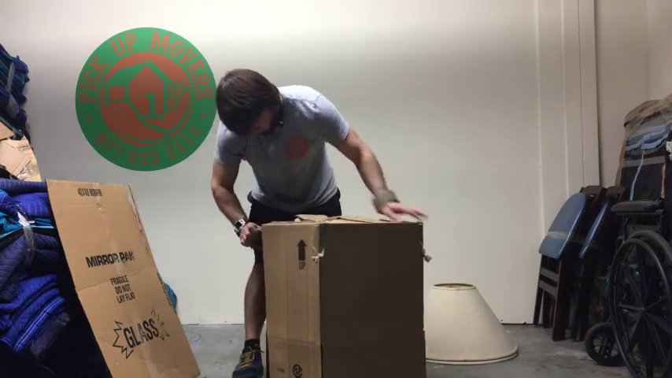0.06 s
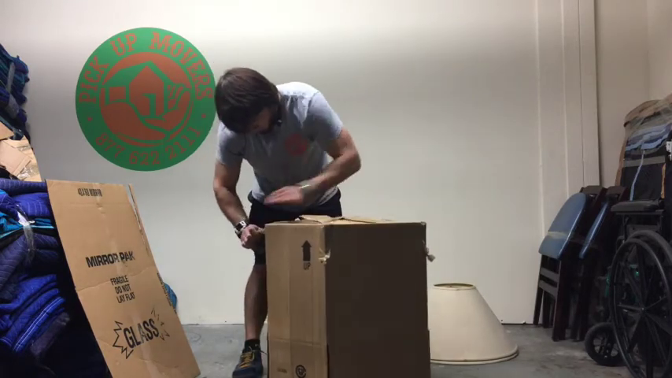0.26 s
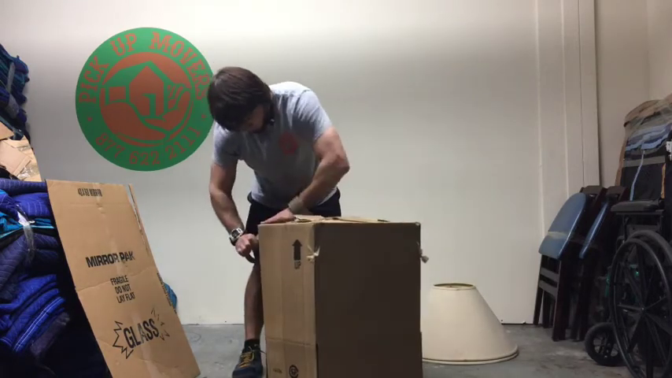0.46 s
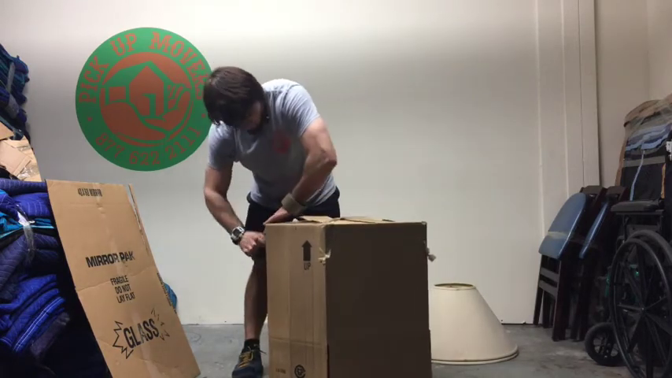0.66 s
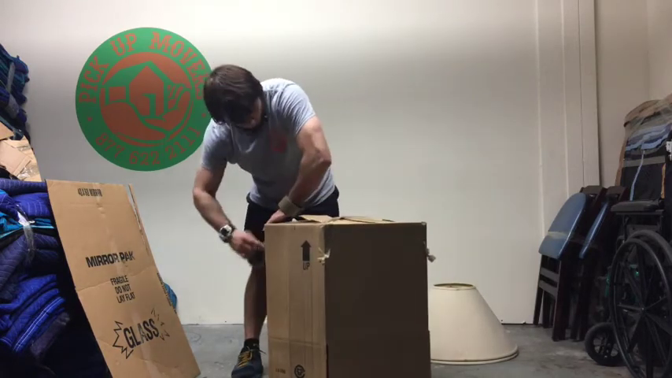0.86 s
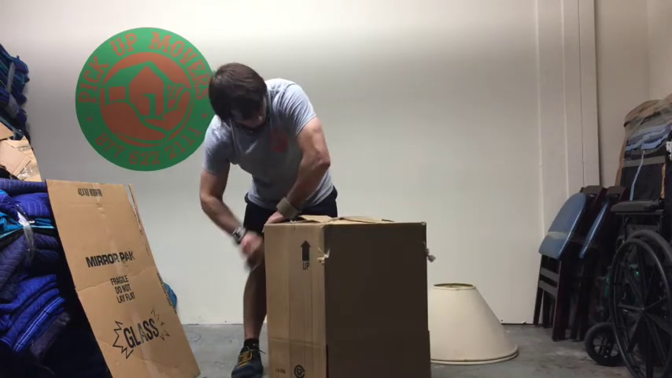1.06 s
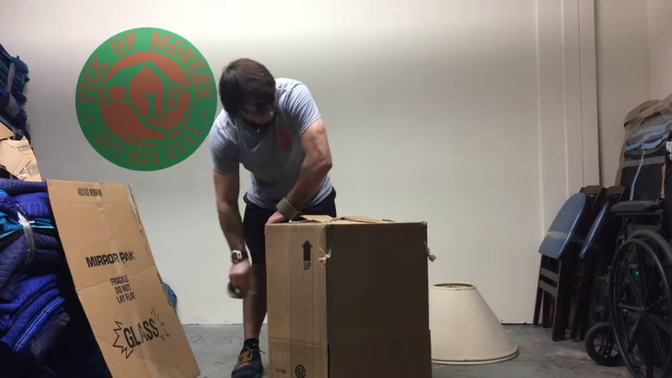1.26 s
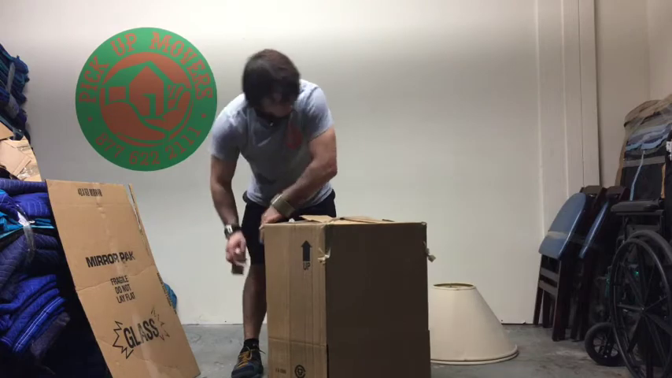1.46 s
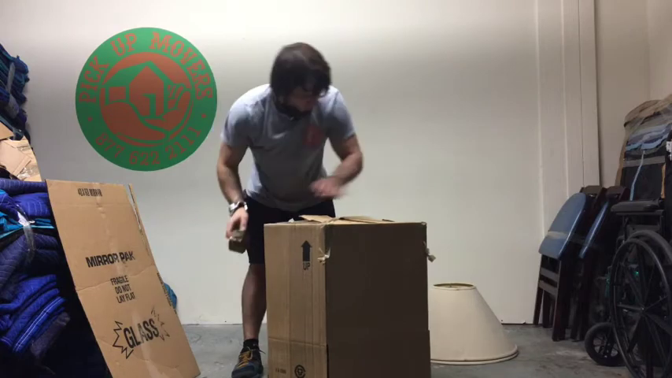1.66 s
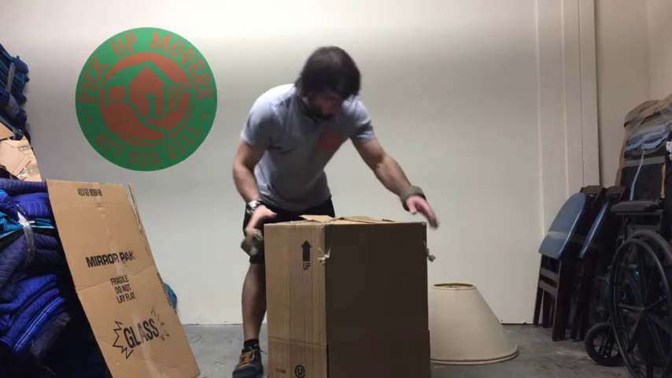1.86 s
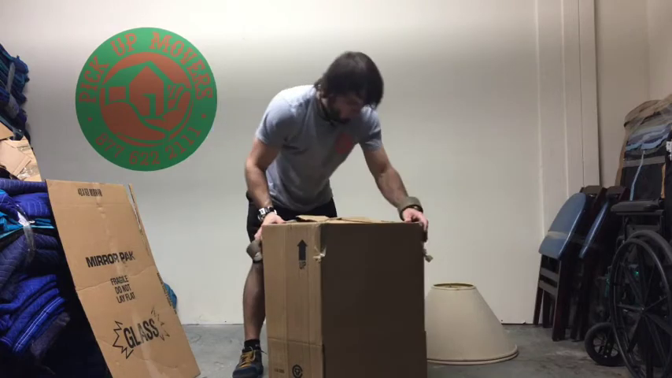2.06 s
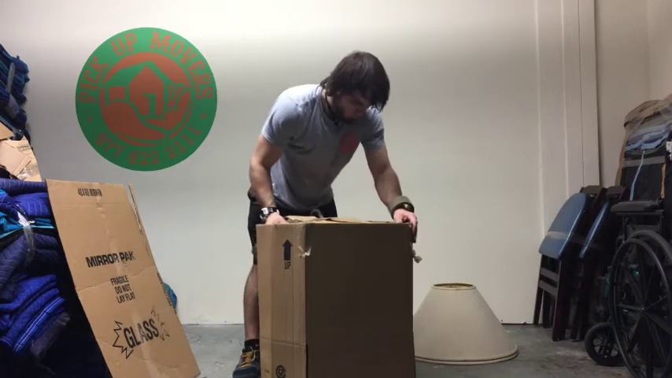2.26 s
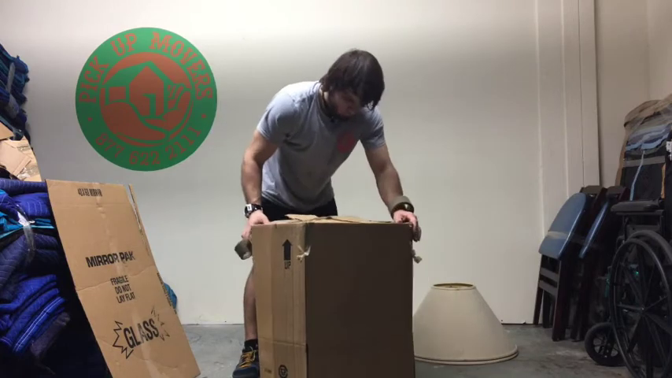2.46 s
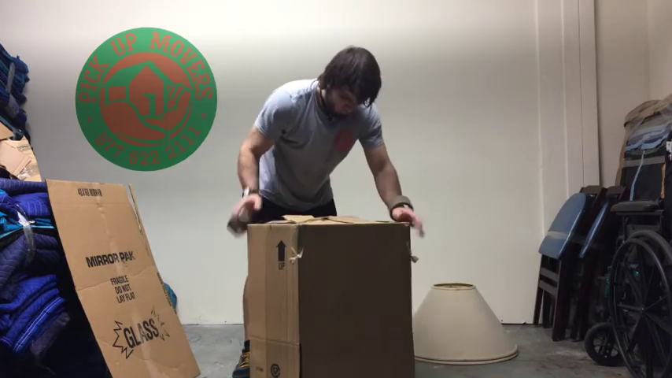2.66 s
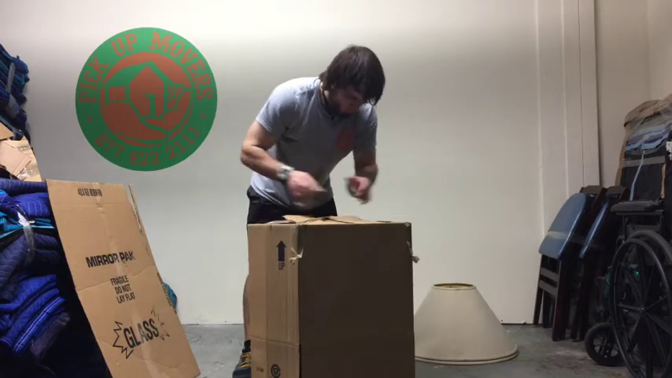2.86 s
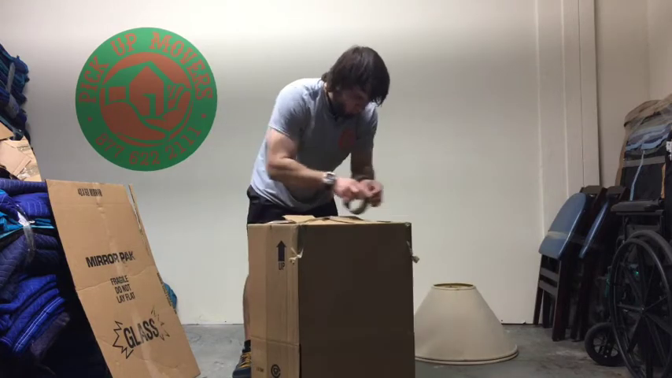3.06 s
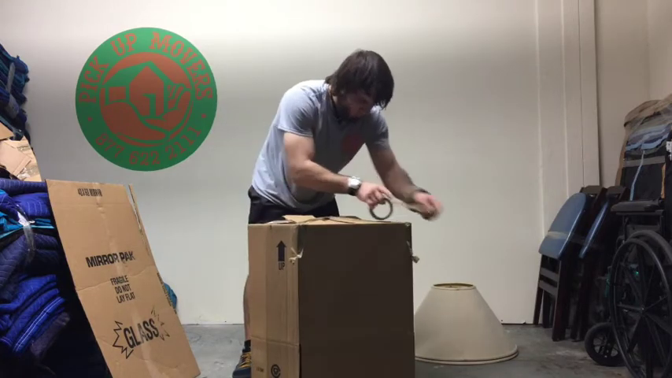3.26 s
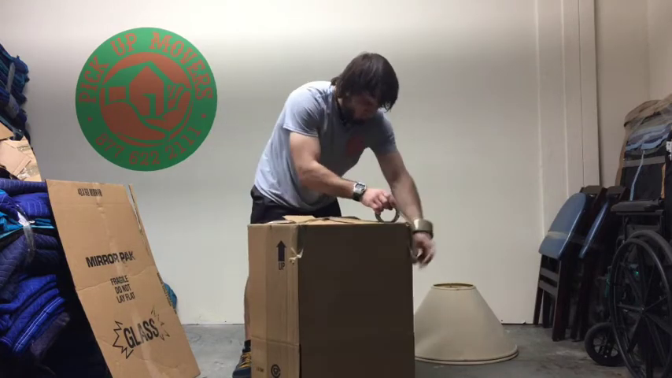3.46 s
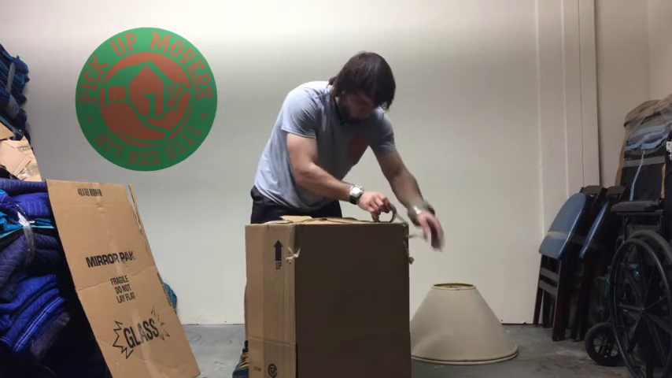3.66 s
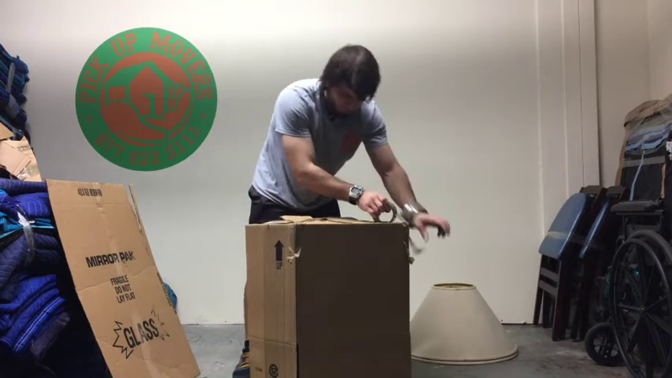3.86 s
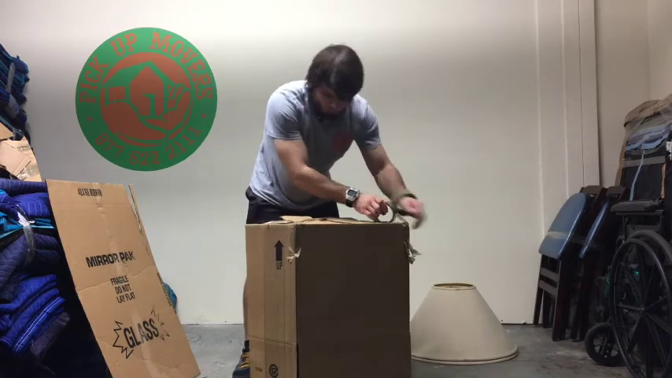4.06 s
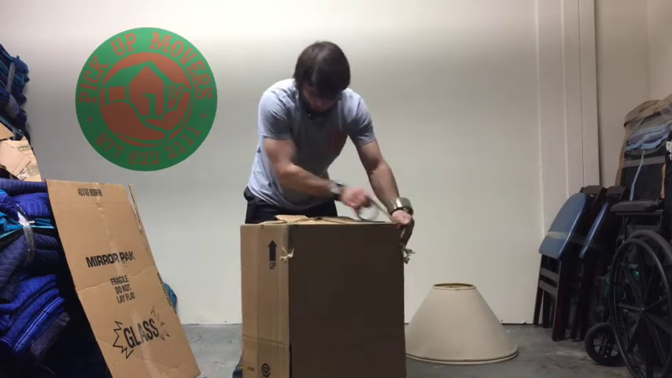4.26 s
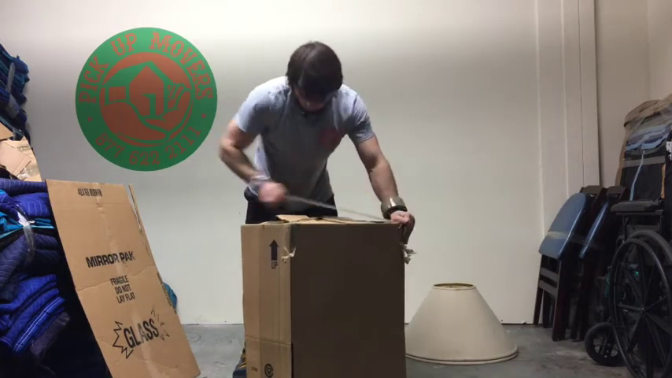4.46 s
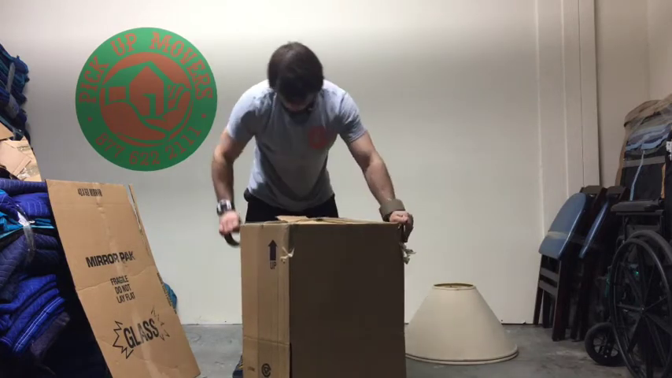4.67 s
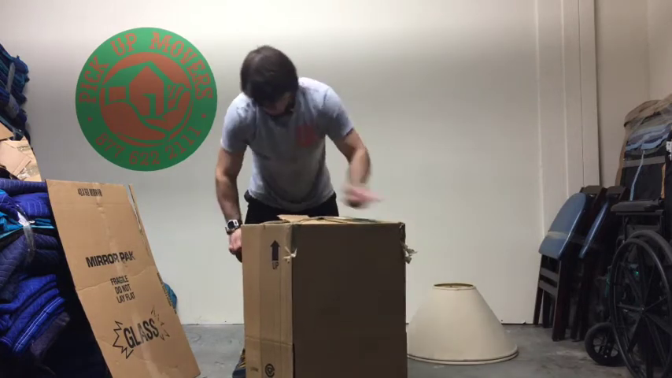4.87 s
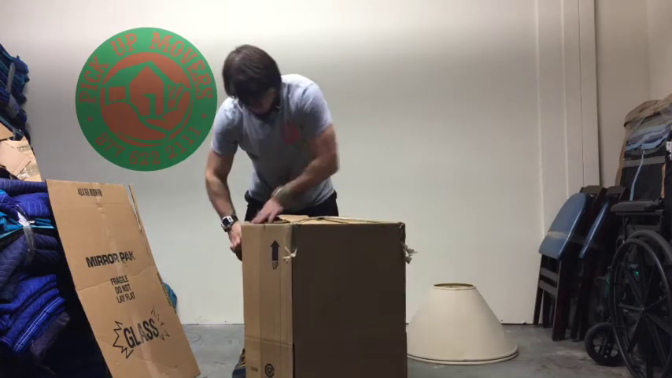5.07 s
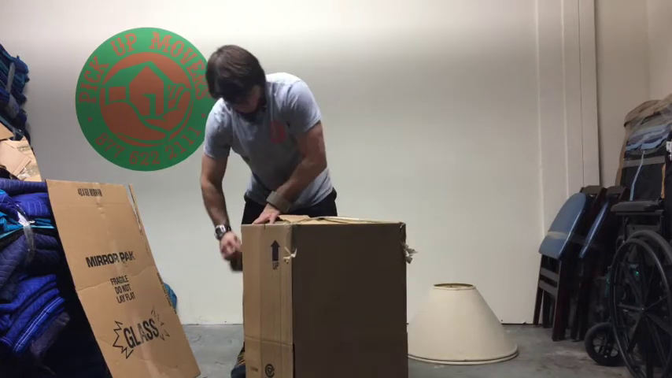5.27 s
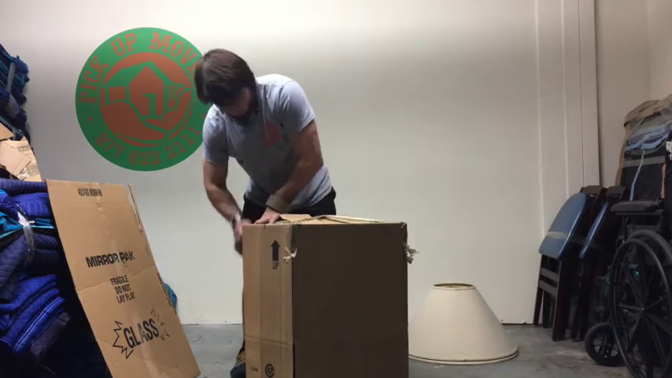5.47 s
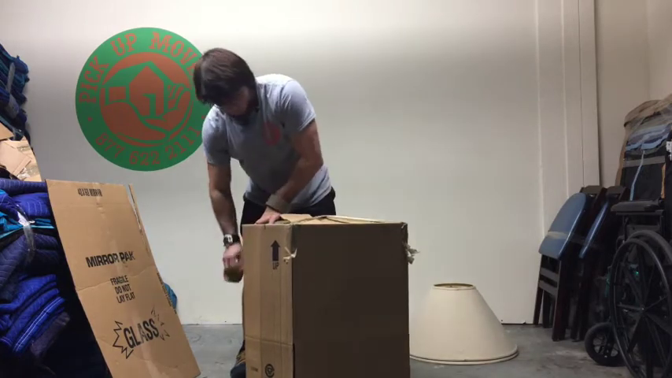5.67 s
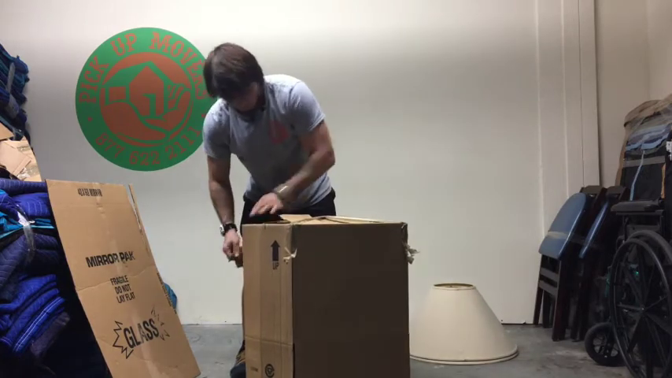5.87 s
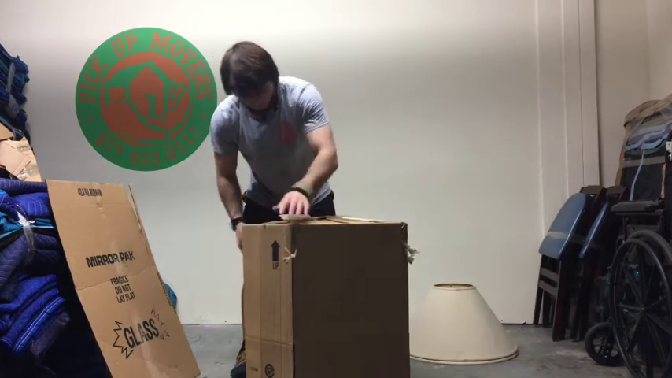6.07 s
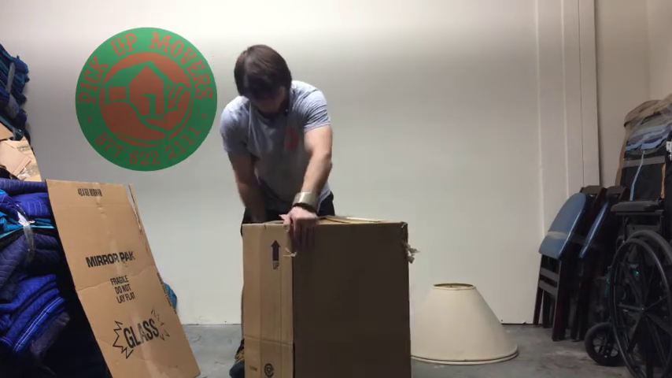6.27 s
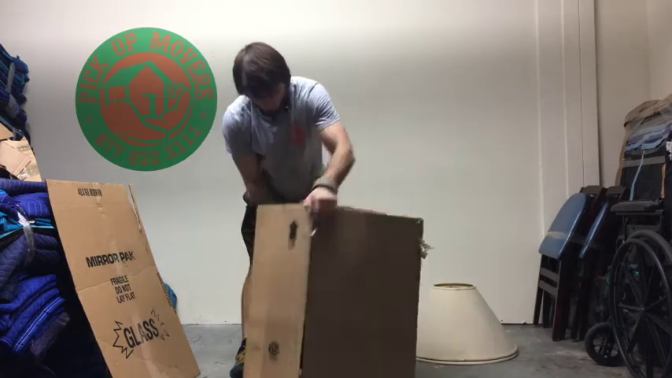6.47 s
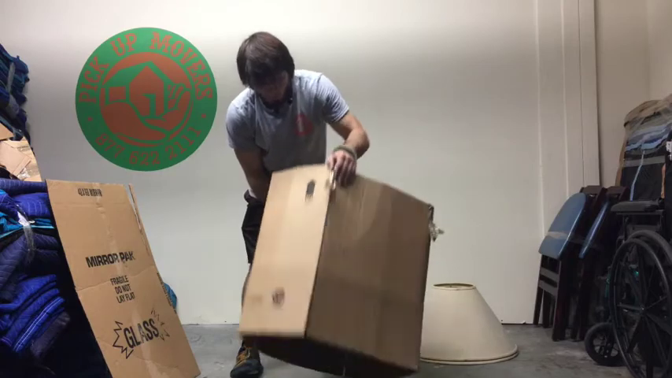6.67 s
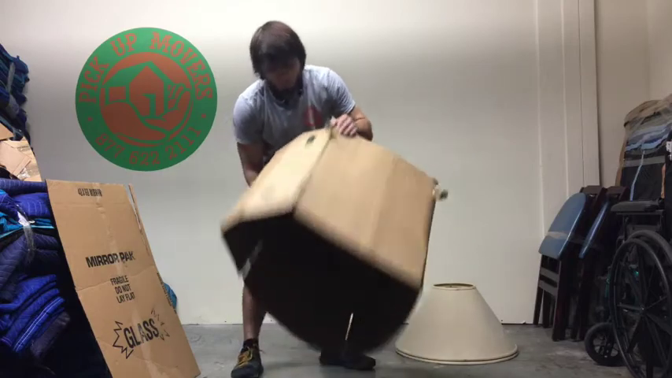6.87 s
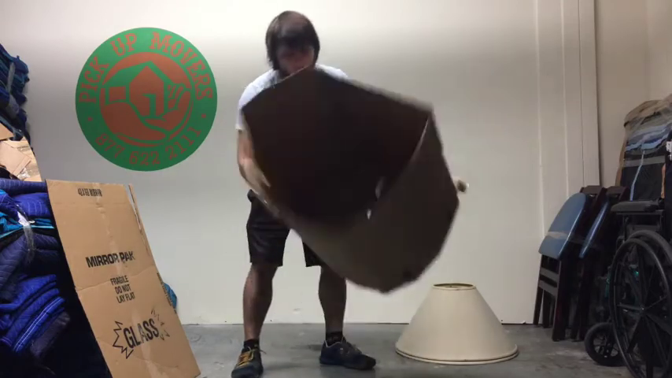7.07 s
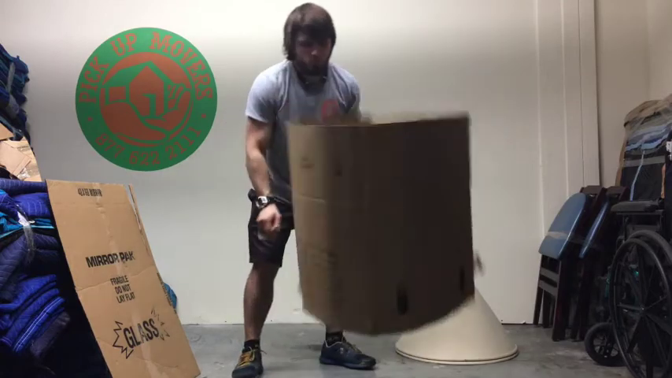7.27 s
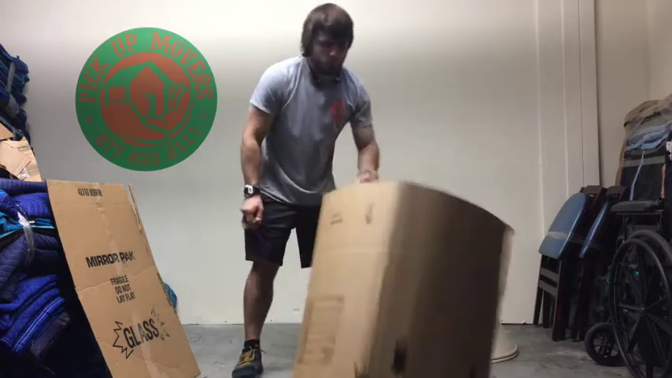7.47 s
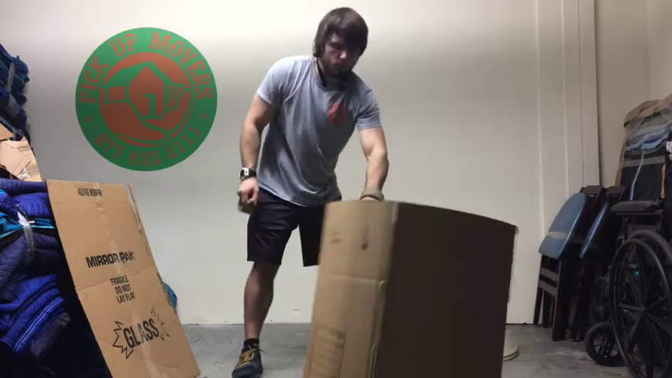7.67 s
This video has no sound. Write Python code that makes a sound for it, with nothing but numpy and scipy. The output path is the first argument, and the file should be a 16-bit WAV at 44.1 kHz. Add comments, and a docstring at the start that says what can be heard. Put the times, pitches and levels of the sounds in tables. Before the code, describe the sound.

Short bursts of sticky tape ripping, each crackly and ringing on the taut strip, alternate with papery hand slides, smoothing and muffled pats on cardboard. A longer rip comes midway with hard snaps and hollow knocks, then smaller rasps and rustles. Finally the carton is lifted with a scuffing rustle and dropped on a hard floor. Small reverberant room, mono, faint rumble and hiss behind.

```python
"""Hands rub and pat a big cardboard box while packing tape is peeled off a roll in short rasping strips.
More strips follow, torn and smoothed down, with loose tape snapping and crackling between them.
Near the end the box is turned over and dropped on a hard floor.
Random cracks and noise ring the tape strip and the box; knocks ring its panels and the air inside.
A bare storeroom answers throughout, and a low rumble, a faint tone and soft hiss hang in the air."""
import sys
import numpy as np
from scipy import signal
from scipy.fft import rfft, irfft, next_fast_len
from scipy.io import wavfile
from scipy.ndimage import map_coordinates

SR = 44100
rng = np.random.default_rng(int(sys.argv[2]) if len(sys.argv) > 2 else 0)


def bounce(signal):
    """Save signal as a 16-bit WAV file at the path given by the first command-line argument."""
    frames = np.transpose(np.atleast_2d(signal))
    limited = np.clip(frames, -1, 1)
    pcm = np.round(limited * 32767).astype(np.int16)
    wavfile.write(sys.argv[1], SR, pcm)


N = 340449  # length in samples

# Resonances of the cardboard panels, which pulls, rubs and knocks all set ringing:
# pitch_hz, relative level_db, decay_s (time to fall 60 dB before any extra damping)
PANELS = [(129.2, 2, 0.16), (155.5, 0.5, 0.13), (213.4, -0.5, 0.15), (235.6, 1, 0.14), (288, -2, 0.14),
          (387.4, -3.5, 0.11), (430, -10, 0.072), (497, -8.5, 0.022), (620, -13, 0.038),
          (830, -11.5, 0.026)]


def amp(db):
    """Turn decibels into a plain multiplier."""
    return 10 ** (np.asarray(db) / 20)


def unit(x):
    """Scale a sound to an average (rms) strength of 1."""
    return x / np.sqrt(np.mean(x ** 2) + 1e-20)


def along(points, hz):
    """Read a curve of (Hz, value) points, evenly spaced in pitch rather than in Hz."""
    point_hz, values = np.transpose(points)
    return np.interp(np.log(hz + 1), np.log(point_hz + 1), values)


def strokes(start, rise, hold, fade, *levels_db):
    """Loudness of many strokes: each rises, drifts through its levels while held, then fades; powers add."""
    rise_db, fade_db = 23, 30  # climb during the rise; drop in one fade time
    late_turn = 0.62  # under 1, the middle level of a held stroke comes after half-way
    power, t = np.zeros(N), np.arange(N) / SR
    # only the size of each time counts, not its sign
    for s, up, keep, down, *db in np.broadcast(start, abs(rise), abs(hold), abs(fade), *levels_db):
        held = up + keep * np.linspace(0, 1, num=len(db)) ** late_turn
        knots = [0, *held, up + keep + 2 * down]
        knots_db = [db[0] - rise_db, *db, db[-1] - 2 * fade_db]
        part = slice(round(s * SR), round((s + knots[-1]) * SR))
        power[part] += amp(2 * np.interp(t[part] - s, knots, knots_db))
    return np.sqrt(power)


def wobble(rate):
    """A smooth random curve through this many random points a second."""
    points = rng.standard_normal(int(N * rate / SR) + 4)
    return map_coordinates(points, [np.arange(N) * rate / SR])


def filtered(x, response):
    """Pass a sound through a filter given as a complex response to frequency."""
    m = next_fast_len(N + SR // 2)
    return irfft(rfft(x, m) * response(np.fft.rfftfreq(m, 1 / SR)), m)[..., :N]


def colour(x, spectrum):
    """Shape a sound by (Hz, dB) points, falling steeply below the first one, at rms 1."""
    return unit(filtered(x, lambda hz: amp(along(spectrum, hz)) * np.minimum(hz / spectrum[0][0], 1) ** 4))


def resonance(hz, width_hz):
    """One ringing pitch that starts only after it is excited, with gain 1 at its centre."""
    return lambda f: 1j * f * width_hz / (hz * hz - f * f + 1j * f * width_hz)


def modes(table, damping):
    """All of an object's ringing pitches; a shorter decay or more damping makes each one wider."""
    widths = [damping * np.log(1000) / (np.pi * t60) for _, _, t60 in table]
    # the sign alternates from one resonance to the next
    return lambda f: sum((-1) ** k * amp(db) * resonance(hz, w)(f) / w
                         for k, ((hz, db, _), w) in enumerate(zip(table, widths)))


def gliding(x, track_hz, centres, sharpness):
    """Follow a moving resonance by cross-fading between fixed ones; rms about 1."""
    place = np.interp(np.log(track_hz), np.log(centres), np.arange(len(centres)))
    return sum(np.sqrt(np.clip(1 - abs(place - k), 0, 1)) * unit(filtered(x, resonance(c, c / sharpness)))
               for k, c in enumerate(centres))


def cracks(rate, spread_db):
    """Tiny breaks of random size at random moments, about this many a second; rms 1."""
    hit = rng.random(N) < rate / SR
    size = np.minimum(rng.exponential(size=N), 4)
    sign = rng.standard_normal(N)
    return unit(hit * amp(spread_db * size) * sign)


def air():
    """Filtered noise: building rumble that swells unevenly, a faint narrow tone and soft hiss."""
    # colour of the hiss: pitch_hz, relative density_db (per Hz)
    hiss_colour = [(15, -7), (25, 3), (69, 4.5), (126, -11), (156, -17.5), (267, -16.5), (313, -23),
                   (378, -19.5), (433, -34), (1200, -33.5), (2000, -41), (4380, -47), (5010, -55),
                   (6730, -52), (15500, -66)]
    # rumble loudness before a small random wobble: time_s, level_db
    rumble_levels = [(0.0, -45.5), (1.42, -49), (1.55, -46.5), (1.78, -63), (2.19, -41.5), (2.47, -47.5),
                     (3.18, -50), (3.61, -43), (3.93, -52), (5.1, -43), (5.25, -49), (5.85, -54),
                     (6.39, -46), (7.22, -47), (7.5, -52), (7.72, -48)]
    # the faint tone: pitch_hz, width_hz, level_db
    faint_tone = (378, 8, -74)
    hiss_db = -49
    rumble_colour = [(24, -41.0), (40, -16.0), (55, 13.5), (70, -10.5), (100, -3.5), (150, -30.0), (250, -53.5)]
    hz, width_hz, tone_db = faint_tone
    s, rumble_db = np.transpose(rumble_levels)
    rumble = colour(rng.standard_normal(N), rumble_colour)
    tone = unit(filtered(rng.standard_normal(N), resonance(hz, width_hz)))
    hiss = colour(rng.standard_normal(N), hiss_colour)
    swell = amp(np.interp(np.arange(N) / SR, s, rumble_db) + 1.0 * wobble(3.5))
    return swell * rumble + amp(tone_db) * tone + amp(hiss_db) * hiss


def room(x, piece=.25):
    """Echoes as fading noise, each pitch dying at its own speed; the source moves, so the tail changes."""
    # how long the room rings: pitch_hz, decay_s (time to fall 60 dB)
    room_decay = [(100, 0.37), (1000, 0.27), (5000, 0.31), (14000, 0.14)]
    out, step = np.zeros(N + 2 * SR), round(piece * SR)  # a fresh tail for each piece, in seconds
    for start in range(0, N, step):
        hz, t, z = signal.stft(rng.standard_normal(SR // 2), SR, nperseg=256)
        fading = z * amp(-60 * t / along(room_decay, hz)[:, None])
        tail = signal.istft(fading, SR, nperseg=256)[1]
        wet = signal.fftconvolve(x[start:start + step], tail / np.linalg.norm(tail))
        out[start + 250:][:len(wet)] += wet  # the echoes arrive 250 samples late
    return out[:N]


def knocks():
    """Every blow rings the panels and the air inside at new strengths, with a flat slap of cardboard."""
    # pats, tugs and knocks: time_s, relative level_db, slap_db and boom_db (relative to the blow), panel_hz
    blows = [(0.721, -44, 5.5, -11, 121), (0.93, -27, -10, -29, 294), (1.143, -25.5, -8, -7.5, 228),
             (1.24, -32, -0.5, -6, 232), (1.969, -29.5, -6.5, -11, 233), (2.042, -28.5, -17, -11, 124),
             (2.222, -32.5, 0, -8, 256), (2.394, -36, -8.5, -19, 234), (2.596, -39.5, -1, -9, 221),
             (3.533, -34, 3, -14, 248), (4.301, -20.5, -32, -23, 129), (4.372, -29.5, -13, -23, 208),
             (4.402, -22, -17, -32, 143), (4.448, -24.5, -7, -36, 152), (4.858, -28, -13.5, -14, 145),
             (5.271, -26, -5, -22, 560), (5.473, -32.5, 0.5, -4, 134), (5.574, -22, -3, -25, 550),
             (6.238, -41.5, -18, -0.5, 129), (6.377, -24.5, -7.5, -16, 124), (6.684, -46, -14, -3, 121),
             (7.502, -12, -17, -8, 215), (7.511, -13, -25, -11.5, 150), (7.625, -26, -14, -23, 299)]
    # ringing of the air inside the box: pitch_hz, relative level_db, decay_s (time to fall 60 dB)
    inside_air = [(50.5, 1, 0.54), (61.2, 5, 0.37), (92.7, 12.5, 0.15)]
    out, slap, t = np.zeros(N + SR), np.zeros(N + SR), np.arange(SR // 2) / SR

    def ring(table, attack):
        """Dying sine waves that start softly, each varied a little in strength and pitch."""
        waves = sum(amp(db + rng.normal(0, 1.5) - 60 * t / t60)
                    * np.sin(2 * np.pi * hz * (1 + .015 * rng.normal()) * t) for hz, db, t60 in table)
        return (1 - np.exp(-t / attack)) * waves

    for s, db, slap_db, boom_db, panel_hz in blows:
        # modes near the pitch of the struck panel ring the most
        struck = [(hz, level - 8.2 * min(abs(np.log2(hz / panel_hz)), 1.2), t60) for hz, level, t60 in PANELS]
        boom = amp(boom_db + 3.0) * ring(inside_air, attack=.008)
        out[round(s * SR):][:len(t)] += amp(db - 4.0) * (ring(struck, attack=0.0021) + boom)
        slap[round(s * SR):][:len(t)] += amp(db + slap_db + 10 - 60 * t / 0.12) * rng.standard_normal(len(t))
    return out[:N] + filtered(slap[:N], lambda f: resonance(650, width_hz=1000)(f) / (1 + 1j * f / 1500) ** 2)


def snaps():
    """Each snap of tape is a burst of noise: a sharp crack with a short dying crinkle."""
    # tape snaps and ticks: time_s, relative level_db, body_db (duller part, relative to the snap)
    ticks = [(0.0796, -26, -31), (0.2217, -20.5, 2.5), (0.3413, -19, -1), (0.432, -8.5, -20),
             (0.451, -19, -19), (0.4614, -28, -13), (0.4813, -21, -23.5), (0.5743, -30, -23.5),
             (0.851, -25.5, -24), (1.0187, -6, -17), (1.233, -11, -17), (1.606, -34, -27),
             (1.7462, -50, -20), (1.8654, -36.5, -19), (2.145, -24, -5), (2.231, -25, -8),
             (2.5175, -20.5, -25), (2.9406, -36, 6), (3.0086, -36, -17), (3.0267, -32, -27),
             (3.0689, -29.5, -34), (3.0894, -32, -24), (3.114, -22, -33), (3.1622, -16, -23),
             (3.5107, -23, -7), (3.6394, -19, -1), (3.7604, -24.5, -9), (3.835, -28.5, -28.5),
             (3.9545, -38.5, 4.5), (4.0506, -35, -35), (4.1828, -36, -16), (4.2455, -14, -7),
             (4.285, -6, -1.5), (4.6543, -17, -29), (4.6743, -9.5, 0), (4.766, -21, -21),
             (4.8042, -18, -26), (4.8803, -16.5, -21), (4.9274, -19, -30.5), (4.9682, -30, -36),
             (5.13, -24, -20), (5.225, -37, -7), (5.2515, -17.5, 4), (5.5697, -32, -10), (5.58, -17, -23),
             (5.847, -26, -11), (5.914, -25, -32), (6.0033, -30, -28), (6.0901, -22, -15),
             (6.6807, -27, -15), (7.1177, -24, -6), (7.5023, -18, -15), (7.6248, -17.5, -25)]
    bright, dull, t = np.zeros(N + SR), np.zeros(N + SR), np.arange(SR // 4) / SR
    for s, db, body_db in ticks:
        crack, crinkle = 0.7 * amp(-60 * t / 0.0047), 0.37 * amp(-60 * t / 0.068)
        burst = rng.standard_normal(len(t)) * (crack + crinkle)
        bright[round(s * SR):][:len(t)] += amp(db - 8) * burst
        dull[round(s * SR):][:len(t)] += amp(db + body_db - 5.5) * burst
    return (filtered(bright[:N], lambda f: resonance(6000, width_hz=9000)(f) * (f / (f - 1800j)) ** 2)
            + filtered(dull[:N], lambda f: resonance(1200, width_hz=1600)(f) * f / (f - 400j)))


def hands():
    """Skin and tape dragged over cardboard: clumped grains that also stir the box panels."""
    # hand slides: start_s, rise_s, hold_s, fade_s (time to drop 30 dB), rustle_db,
    # scrape_db and body_db (relative to the rustle); the sign of a time does not matter
    slides = [(0, 0.00069, .02, .09, -53.5, 0, 4), (.078, .004, 0.083, 0.04, -41.5, -9, -9.5),
              (0.212, 0.0025, 0.0057, 0.3, -51, -7, 0), (0.572, 0.0015, 0.007, -0.08, -33.5, -7.5, -1),
              (0.588, 0.0097, 0.031, .27, -53, -5, 4), (.82, .03, .01, .03, -60, 2, 8),
              (0.845, 0.005, 0.084, -0.27, -41.5, -12, -10), (1.135, 0.0039, 0.013, 0.23, -50, -5, 8),
              (1.262, 0.012, 0.016, 0.33, -50, -15, -13), (1.424, 0.026, 0.14, -0.1, -67.5, -1.5, 3),
              (1.963, 0.014, 0.0045, 0.06, -50, 0.5, 16.5), (1.996, 0.018, 0.085, 1, -62.5, 1, 9.5),
              (2.097, 0.065, 0.042, 0.14, -46.5, -5, -6), (2.183, 0.031, 0.0067, 0.26, -44.5, -1.5, 0.5),
              (2.317, 0.048, 0.14, 0.02, -52, -4, -2), (2.488, 0.015, 0.0096, .12, -48, 1, 1),
              (2.585, 0.023, 0.068, 0.33, -53.5, 1, 4), (2.8, 0.027, 0.083, -0.2, -65, -8, 6.5),
              (3.013, 0.0034, 0.0062, .1, -46, -22, -26), (3.489, 0.037, 0.0055, 0.14, -43.5, -7, -5.5),
              (3.605, 0.031, 0.027, 0.18, -44.5, -6.5, -6.5), (3.743, 0.021, 0.0097, .1, -51, -6.5, -9),
              (3.824, 0.0051, 0.0033, 0.11, -54, -7, -8), (4.144, 0.049, 0.012, 0.2, -56, -5.5, -7),
              (4.252, 0.0024, .012, 0.86, -38, -10, -14), (4.8, 0.0048, 0.0089, -0.23, -48, -1.5, -2),
              (4.906, 0.012, .04, .13, -47, -11, -7), (5.115, .04, .025, .18, -49, -9, -1.5),
              (5.461, .01, 0.029, -0.72, -49.5, -7, 7), (5.614, 0.017, 0.014, 0.19, -48.5, -20, -18),
              (5.753, 0.032, 0.017, 0.17, -55, -12.5, -21), (5.856, 0.0054, 0.012, 0.85, -58, -12, -9),
              (5.887, .025, 0.0096, 0.04, -46.5, -12, -7), (6.21, 0.046, 0.02, 1, -55, -5.5, 4),
              (6.372, 0.0091, 0.078, -0.02, -58, 7.5, 16.5), (6.494, .04, 0.091, 1.6, -58, -5, 1),
              (6.674, 0.005, 0.0076, 0.11, -43.5, -2, -4.5), (6.751, 0.02, 0.2, -0.56, -57, 1.5, -6),
              (7.001, 0.055, 0.074, -0.08, -43, -6.5, -1), (7.087, 0.063, 0.028, 0.07, -35, -6, -7),
              (7.195, 0.014, 0.032, 0, -48.5, 1, 2), (7.46, .004, .03, -12, -68, 5.5, 5),
              (7.5, .001, 0.01, 0.17, -35, -0.5, 3), (7.62, 0.012, 0.015, 0.1, -40.5, -2.5, 8),
              (7.691, 0.031, .03, 5, -41, -2, 0)]
    # colour of the bright rustle: pitch_hz, relative density_db (per Hz)
    rustle_colour = [(1180, -17.5), (2000, -1), (2920, -3.5), (3120, -0.5), (4400, -1), (4880, -3.5),
                     (6750, -0.5), (10500, -6), (11800, -6.5), (15500, -10)]
    # colour of the lower scrape: pitch_hz, relative density_db (per Hz)
    scrape_colour = [(250, -17), (420, -1.5), (720, -3.5), (950, -3), (1500, -6.5), (2200, -18.5),
                     (3200, -33.5), (6000, -61)]
    start, rise, hold, fade, db, scrape_db, body_db = np.transpose(slides)
    gain = lambda rel_db: strokes(start, rise, hold, fade, db + rel_db, db + rel_db)
    grit = unit(cracks(rate=9000, spread_db=1.3) * amp(1.9 * wobble(70)))
    rustle, scrape = colour(grit, rustle_colour), colour(grit, scrape_colour)
    body = unit(filtered(grit, modes(PANELS, damping=2.04)))
    return gain(0) * rustle + gain(scrape_db) * scrape + gain(body_db) * body


def tape():
    """Glue sticks and slips: fine cracks in quick bursts plus coarse slips ring the taut strip and the box."""
    # strips peeled or torn: start_s, rise_s, hold_s, crackle_db, swell_db (change over the hold),
    # low_start_db, low_middle_db, low_end_db (lower strip modes, relative to the crackle),
    # high_start_db, high_middle_db, high_end_db (upper strip modes, likewise),
    # drum_db (box, relative), panel_hz, bright_db (bright band, relative), bright_start_hz, bright_end_hz
    pulls = [(0.34, .012, 0.13, -37, 4, -5, -5.5, -12.5, -7, -1.5, -7, -2.5, 192, -7.5, 3230, 4700),
             (.888, .018, .142, -32, 2.5, -4, -10.5, -10.5, -7, -8.5, -9.5, -6, 258, -9, 2560, 4500),
             (1.21, 0.028, 0.0034, -26, 0, -13, -12, -9, -9, -18, -7, -8, 188, -10, 3900, 3920),
             (3.088, 0.021, 0.04, -44, -3, -32, -31, -32, -7, -11, -18, -35.5, 150, -9.5, 3570, 3540),
             (3.161, 0.0045, 0.22, -33, 0.5, -6.5, -13, -12.5, -4.5, -4.5, -10, -32, 150, -14, 4160, 4600),
             (4.257, 0.021, 0.4, -31.5, 1, -10.5, -2, -9.5, -1.5, -5.5, -9, -3.5, 174, -12, 4300, 3640),
             (4.878, 0.0033, 0.057, -39, -5, -20, -14, -22, -8, -11, -15, -5, 170, -4.5, 2820, 2490),
             (5.253, 0.022, 0.099, -30.5, 1, -5, -22, -12.5, -5, -17, -7.5, -10, 267, -11, 3760, 4240),
             (5.544, 0.028, 0.0092, -25, 0.5, -8, -9, -10, -5, -7, -4, -12, 225, -10, 4200, 4150),
             (6.001, 0.068, 0.066, -48, -1.5, -30, -27, -30, -26, -3, -13, -32, 200, -11, 3250, 2430)]
    # colour of the crackle: pitch_hz, relative density_db (per Hz)
    crackle_colour = [(1180, -62), (2000, -37.5), (2270, 6.5), (2840, -0.5), (3150, -0.5), (4400, -2.5),
                      (5000, -10), (5540, 4), (7880, -2), (8660, 3.5), (10500, -4), (11600, 0.5),
                      (15500, -6)]
    # lower and upper family of the taut strip's resonances: pitch_hz, width_hz, relative level_db
    strip_modes = [
        [(524, 500, -9.5), (808, 206, -1.5), (925, 165, 1.5), (1220, 107, 0)],
        [(1414, 260, -2), (1710, 108, 2), (1890, 250, -1.5), (2295, 270, -2.5)],
    ]
    fade_s = 0.06  # a pull that stops drops 30 dB in this time
    (start, rise, hold, db, swell_db, low0, low1, low2, high0, high1, high2,
     drum_db, panel_hz, bright_db, bright0, bright1) = np.transpose(pulls)

    def gain(a, b, c):
        """Loudness of all pulls, with relative dB at the start, middle and end of each hold."""
        return strokes(start, rise, hold, fade_s, db + a, db + swell_db / 2 + b, db + swell_db + c)

    def track(a, b):
        """A pitch that glides from a to b during each hold, and on to the next pull."""
        times = np.ravel([start + rise, start + rise + hold], "F")
        return np.interp(np.arange(N) / SR, times, np.ravel([a, b], "F"))

    fine = unit(cracks(rate=30000, spread_db=1.3) * amp(1.36 * wobble(230) + 0.54 * wobble(40)))
    # a slip releases tension one way only and is a little blunter than the fine cracks
    slips = -abs(cracks(rate=500, spread_db=-0.1))
    slips = unit(filtered(slips, lambda f: f / (f - 300j) / (1 + 1j * f / 6000)))
    peel = fine + 0.51 * slips

    def strip(family):
        """The taut strip ringing in one family of its resonances."""
        return unit(filtered(peel, lambda f: sum((-1) ** k * amp(g) * resonance(hz, w)(f)
                                                 for k, (hz, w, g) in enumerate(family))))

    low, high = (strip(family) for family in strip_modes)
    # a bright band moves with the peel angle
    edge = gliding(peel, track(bright0, bright1), np.geomspace(2400, 6000, num=10), sharpness=3.5)
    # the pull tugs on one panel or another
    panel = gliding(peel, track(panel_hz, panel_hz), [hz for hz, _, _ in PANELS[:5]], sharpness=2.7)
    drum = 0.53 * panel + 0.43 * unit(filtered(peel, modes(PANELS, damping=4.0)))
    crackle = colour(peel, crackle_colour)
    return (gain(0, 0, 0) * crackle + gain(low0, low1, low2) * low + gain(high0, high1, high2) * high
            + gain(*[bright_db] * 3) * edge + gain(*[drum_db] * 3) * drum)


def scene():
    """All near sources, direct and through the room, over the background air."""
    near = tape() + hands() + snaps() + knocks()
    return (near + amp(-11) * room(near) + air())[None]


def record(dry):
    """The microphone rolls off the deep bass and keeps nothing above its band limit."""
    top_hz = 15900
    return filtered(dry, lambda hz: (hz / (hz - 36j)) ** 3 * (hz < top_hz))


dry = scene()
out = record(dry)
bounce(out)
```